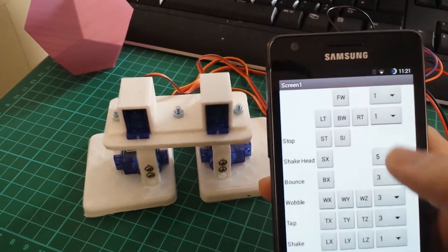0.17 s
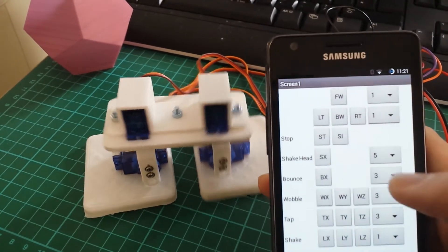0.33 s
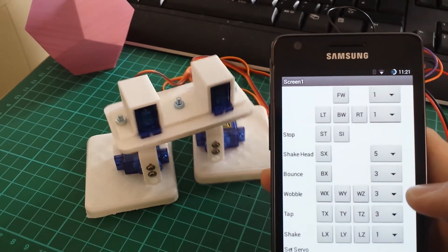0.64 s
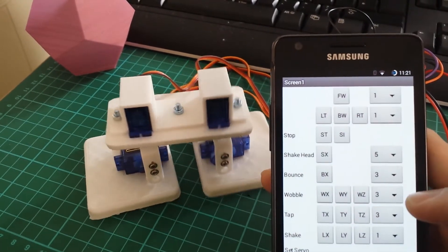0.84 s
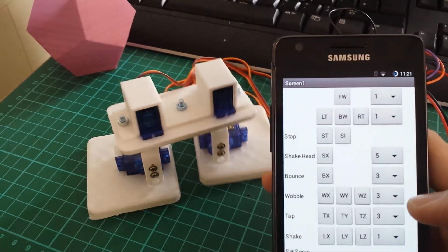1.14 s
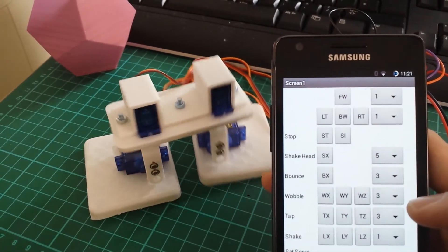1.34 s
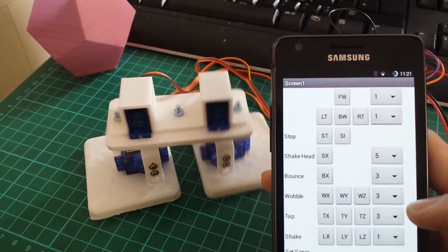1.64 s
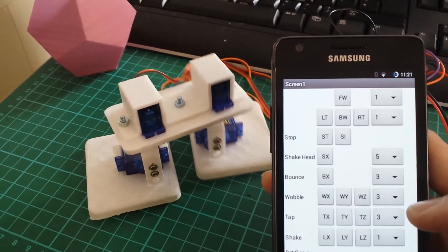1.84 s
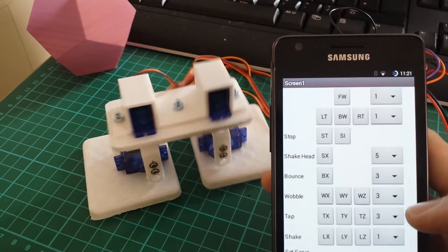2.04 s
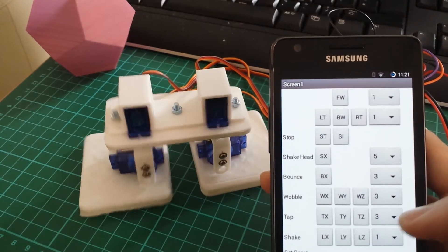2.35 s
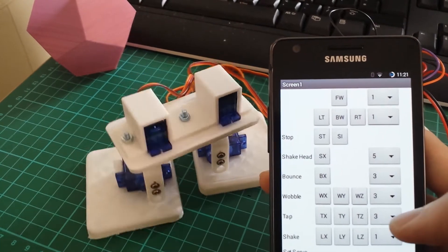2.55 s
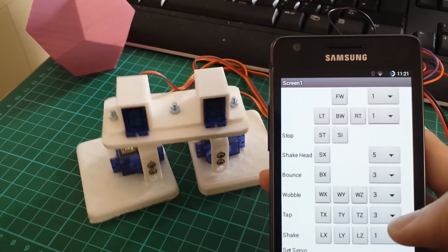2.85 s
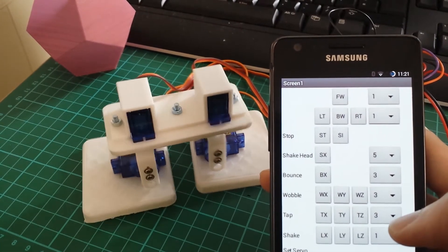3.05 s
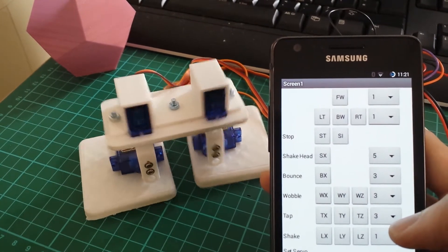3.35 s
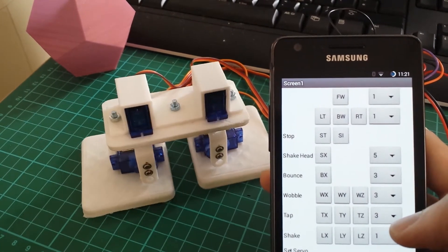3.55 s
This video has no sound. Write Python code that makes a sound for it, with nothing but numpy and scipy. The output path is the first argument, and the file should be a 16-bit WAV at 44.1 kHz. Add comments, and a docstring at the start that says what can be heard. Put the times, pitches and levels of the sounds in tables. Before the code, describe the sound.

Hobby servos in a little plastic robot buzz in a rapid run of bright bursts, their gears ticking between moves. Midway through, one foot knocks on the work table. The sound is close, with a low room hum underneath.

```python
"""Servo robot rocking on a table

Hobby servos rock a small plastic robot: loud fast swings alternate with slower, rougher strokes.
Gear teeth rattle in the servo cases, faster as the motors speed up; 50 Hz drive pulses jolt the gears.
Just past half-way a foot clacks down on the work table and rebounds. A low room hum lies underneath."""
import sys
import numpy as np
from scipy import signal
from scipy.fft import rfft, irfft, next_fast_len
from scipy.io import wavfile
from scipy.ndimage import uniform_filter1d, map_coordinates

SR = 44100
rng = np.random.default_rng(int(sys.argv[2]) if len(sys.argv) > 2 else 0)


def dump_mix(stems):
    """Bounce the given channels to the path in sys.argv[1] as a 16-bit WAV at rate SR."""
    frames = np.atleast_2d(stems).T  # one column per channel
    limited = np.clip(frames, -1, 1)  # hard clip at full scale
    pcm = np.round(limited * 32767).astype(np.int16)
    wavfile.write(sys.argv[1], SR, pcm)


N = 163170
T = np.arange(N) / SR
DRIVE_HZ, FIRST_PULSE_S = 50, .1555

# The rattle's bands, low to high. Each row: lower edge in Hz, then the share it takes of the
# rasp, treble and low-body boosts.
RATTLE_BANDS = [(0, 0, 0, 1), (1250, 0, 0, .4), (2800, 0, 0, 0), (5800, 1, 0, 0), (7200, 0, 0, 0),
                (9000, 0, 1, 0), (11500, 0, 1, 0)]


def from_db(db):
    """Decibels to gain."""
    return 10 ** (np.asarray(db) / 20)


def unit_rms(x):
    """Scale to rms 1."""
    return x / np.sqrt(np.mean(x ** 2) + 1e-20)


def pan(db):
    """Left and right gains of mean power 1; positive dB leans left."""
    return unit_rms(from_db([[db / 2], [-db / 2]]))


def stereo_noise(likeness=.55):
    """White noise, partly alike on left and right."""
    centre = np.sqrt(likeness) * rng.standard_normal(N)
    return centre + np.sqrt(1 - likeness) * rng.standard_normal((2, N))


def colour(x, points):
    """Minimum-phase EQ of unit power gain, shaped by (Hz, dB) or (Hz, left dB, right dB) points."""
    size = next_fast_len(N + SR // 2) * 2
    hz, *sides = np.transpose(points)
    log_hz = np.log(np.arange(size // 2 + 1) * SR / size + 1)
    curve = from_db([np.interp(log_hz, np.log(hz), db) for db in sides])
    top_loss = np.sqrt(1 + np.exp(20 * (log_hz - np.log(SR / 2.8))))
    cepstrum = irfft(np.log(unit_rms(curve / top_loss)))
    cepstrum[:, 1:size // 2] *= 2
    cepstrum[:, size // 2 + 1:] = 0
    return irfft(rfft(x, size) * np.exp(rfft(cepstrum)))[:, :N]


def resonance(x, hz, width_hz):
    """One ringing mode; white noise keeps its power."""
    r = np.exp(-np.pi * width_hz / SR)
    feedforward = np.sqrt((1 - r * r) / 2) * np.array([1, 0, -1])
    feedback = [1, -2 * r * np.cos(2 * np.pi * hz / SR), r * r]
    return signal.lfilter(feedforward, feedback, x + 1e-18)


def struck(clicks, hz, width_hz):
    """A unit click rings a mode at a height of about 1."""
    return resonance(clicks, hz, width_hz) / np.sqrt(4 * np.pi * width_hz / SR)


def dying(power, decay_s):
    """Power of bursts whose amplitude dies with the given time constant."""
    return signal.lfilter([1], [1, -np.exp(-2 / (decay_s * SR))], power + 1e-18)


def crack_envelope(power, crack_s, tail_s, tail_db):
    """Each impact is a short crack with a longer tail."""
    return np.sqrt(dying(power, crack_s) + from_db(tail_db) ** 2 * dying(power, tail_s))


def impacts(rows):
    """Power impulses from (seconds, dB) rows."""
    power = np.zeros(N)
    for s, db in rows:
        power[int(s * SR)] += from_db(db) ** 2
    return power


def hum():
    """Steady room hum and rumble, faded in at the start."""
    # Each row: pitch in Hz, level in dB before the fader.
    hum_tones = [(90.5, -72), (150, -66), (181, -73.5), (250, -70), (400, -70), (500, -82)]
    # The rumble's EQ. Each row: frequency in Hz, relative gain in dB.
    rumble_eq = [(20, 5), (45, -5), (90, 5), (170, 8), (260, 4), (370, 0), (470, -8), (800, -10),
                 (2000, -10), (6000, -15), (15000, -16)]
    # The fade-in and later level ride of both. Each row: time in seconds, gain in dB.
    fader = [(0, -11), (.13, -9.5), (.37, 1.5), (2.1, 3), (2.3, 6.5), (2.5, 1.5), (3.7, 3.5)]
    tones = sum(from_db(db) * np.sqrt(2) * np.sin(2 * np.pi * (hz * T + rng.random()))
                for hz, db in hum_tones)
    rumble = from_db(-58.5) * colour(stereo_noise(likeness=.33), rumble_eq)
    return pan(2.6) * from_db(np.interp(T, *np.transpose(fader))) * (tones + rumble)


def soft_tap():
    """One faint, damped tap just before the servos start."""
    return from_db(-48.5) * struck(impacts([(.148, 0)]), hz=900, width_hz=140)


def pulse_envelope(decay_s):
    """Jumps to 1 at each drive pulse and dies away."""
    since_pulse_s = (T - FIRST_PULSE_S) % (1 / DRIVE_HZ)
    return np.exp(-since_pulse_s / decay_s)


def load_wobble(depth_db=1.06, step_s=.018):
    """A random gain: the load on the gears wavers."""
    knots = rng.standard_normal(1000)
    return from_db(depth_db * np.interp(T / step_s, np.arange(len(knots)), knots))


def teeth(per_s, uneven_db, jitter=.27, surge_db=6.5):
    """Gear teeth collide at uneven times and strengths: one envelope of rms 1 for each band."""
    chance = rng.standard_normal((6000, 2 + len(RATTLE_BANDS)))
    hit_at = np.searchsorted(np.cumsum(per_s) / SR, np.arange(len(chance)) + jitter * chance[:, 0])
    # each drive pulse briefly pushes the gears harder
    surge = from_db(surge_db * pulse_envelope(decay_s=.003)) ** 2 / per_s
    sizes, envelopes = np.clip(chance, -2, 2), []
    for tint_db in sizes[:, 2:].T:   # each impact favours different bands
        hits = np.bincount(hit_at, from_db(uneven_db * sizes[:, 1] + tint_db) ** 2, N + 1)[:N]
        power = hits * surge * load_wobble() ** 2
        envelopes.append(unit_rms(crack_envelope(power, crack_s=.00081, tail_s=.0079, tail_db=1)))
    return envelopes


def flicker(x, width_hz=110, life_s=.045):
    """Random narrow peaks and dips flicker through the rattle's noise, strongest in the low mids."""
    # Each row: frequency in Hz, typical depth in dB.
    depths = [(600, 10), (1400, 9), (2300, 4), (4000, 3), (8000, 3), (14000, 3.5)]
    hz, t, spectrum = signal.stft(x, SR, nperseg=2048, noverlap=1792)
    knots = rng.standard_normal((700, 300))
    grid = np.meshgrid(hz / width_hz, t / life_s, indexing="ij")
    field = unit_rms(map_coordinates(knots, grid, order=1, mode="wrap"))
    gain = from_db(np.interp(hz, *np.transpose(depths))[:, None] * np.clip(field, -2, 1.5))
    gain /= np.sqrt(uniform_filter1d(np.mean(gain ** 2, axis=1), size=9))[:, None]   # keep the power
    return signal.istft(spectrum * gain, SR, nperseg=2048, noverlap=1792)[1][:, :N]


def band_noises():
    """The rattle's raw texture: flickering stereo noise, split into bands."""
    spectrum = rfft(flicker(stereo_noise()))
    hz = np.arange(N // 2 + 1) * SR / N
    edges = [band[0] for band in RATTLE_BANDS] + [SR]
    return [irfft(spectrum * ((hz >= low) & (hz < high)), N) for low, high in zip(edges, edges[1:])]


def jolts(case_eq):
    """Drive pulses tick the resting gears; the hardest ones snap across the backlash."""
    # Gear chatter while holding position. Each row: time in seconds, level in dB.
    holding = [(.15, -62), (.19, -45), (.4, -42), (1.5, -41.5), (2.3, -46), (3.4, -41), (3.53, -50.5),
               (3.62, -43.5), (3.665, -52), (3.7, -75)]
    # The gears take up their slack. Each row: time in seconds, relative level in dB, treble boost in dB.
    slack_snaps = [(0.1582, -41, 11), (0.173, -42, -14), (0.2008, -38, 8), (0.222, -34.5, 17),
                   (0.338, -37, -8), (0.656, -31, -6), (0.6991, -26, -10), (0.818, -40, -5),
                   (0.838, -29, 7), (0.8601, -28.5, -4), (0.9964, -40, 2), (1.0166, -26, 3),
                   (1.0576, -25, 3), (1.0842, -22, 1), (1.1947, -30, -12), (1.3353, -27, -15),
                   (1.361, -24.5, -5), (1.383, -25, 0), (1.4204, -26.5, 16), (1.516, -38, -7),
                   (1.538, -30, -7), (1.5588, -36, 14), (1.5807, -29, 2), (1.6744, -29, -1),
                   (1.7915, -24, -4), (1.976, -30, 5), (1.9977, -30, -11), (2.018, -26, -4),
                   (2.249, -22.5, 5), (2.2518, -21, 11.5), (2.255, -21, 9), (2.359, -27, -4),
                   (2.3815, -20, 0), (2.6364, -22.5, -1), (2.8181, -30, -11.5), (2.8358, -27, -7),
                   (2.895, -26, 0), (2.9966, -28, -2), (3.1635, -33, 10), (3.1725, -34, -5),
                   (3.4943, -28.5, -12), (3.554, -39, -6), (3.5754, -41, -10), (3.6568, -41, 18.5)]
    ticking = unit_rms(pulse_envelope(decay_s=.0058) + from_db(-8))   # a floor between pulses
    chatter = from_db(np.interp(T, *np.transpose(holding))) * (T > FIRST_PULSE_S) * ticking
    rattles = teeth(per_s=np.full(N, 600), uneven_db=4.5)
    out = 0
    for rattle, noise, (_, _, treble, _) in zip(rattles, band_noises(), RATTLE_BANDS):
        snaps = impacts([(s, db - 1 + treble * treble_db) for s, db, treble_db in slack_snaps])
        out = out + noise * np.sqrt((chatter * rattle) ** 2 + dying(snaps, decay_s=.0019))
    return colour(out, case_eq)


def gears(strokes, case_eq, base_teeth_per_s, uneven_db, modes_db):
    """Each stroke speeds up, holds and slows; the teeth's rate and force follow, and the case rings."""
    # Weaker modes of the servo cases. Each row: pitch in Hz, width in Hz, relative level in dB.
    case_modes = [(2260, 22, -28), (3310, 210, -29), (5140, 54, -22.5), (7570, 65, -10.5), (9370, 90, -31),
                  (13040, 83, -27)]
    rows = np.array(strokes)
    speeds = np.array([np.interp(T, row[0] + np.cumsum([0, *row[1:4]]), [0, 1, 1, 0]) for row in rows])
    db, ring_db, rasp_db, treble_db, low_db = rows[:, 4:].T

    def force(levels_db):
        """One envelope for all strokes, each at its own level."""
        return np.sqrt(from_db(levels_db) ** 2 @ speeds ** 2)

    rattles = teeth(base_teeth_per_s * (.3 + .76 * speeds.max(axis=0)), uneven_db)
    body = sum(rattle * noise * force(db + rasp * rasp_db + treble * treble_db + low * low_db)
               for rattle, noise, (_, rasp, treble, low) in zip(rattles, band_noises(), RATTLE_BANDS))
    low_cut = signal.butter(3, 1020, "high", fs=SR, output="sos")   # small cases radiate little bass
    body = signal.sosfilt(low_cut, colour(body, case_eq))
    grit = rattles[2] * stereo_noise()
    ring_level = np.sqrt(from_db(db + ring_db) ** 2 @ speeds)   # already sings at low speed
    ring = resonance(grit * ring_level, hz=3972, width_hz=120)
    push = grit * force(db + modes_db)
    modes = sum(from_db(level) * resonance(push, hz, width) for hz, width, level in case_modes)
    # a dry zing stands out in the raspy strokes
    zing = resonance(grit * force(db - 21.5 + 4.9 * rasp_db), hz=6780, width_hz=180)
    return body + from_db(-4.5) * pan(-19) * ring + pan(-29) * (modes + zing)


def slow_strokes(case_eq):
    """Slow moves and short nudges: the teeth strike sparsely, for a rough rasp."""
    # Each row: start, speed-up, hold and slow-down in seconds, relative level in dB,
    # then case ring, rasp, treble and low-body boosts in dB.
    strokes = [(0.205, 0.053, 0.018, 0.065, -32, -18, 3.5, 5, -4),
               (0.512, 0.012, 0.13, 0.015, -33, -4, -0.5, 2.5, -5),
               (0.82, 0.065, 0.053, 0.068, -33.2, -18, 3, 2, 0),
               (1.153, 0.065, 0.075, 0.016, -31, -3, -1, 2, -2),
               (1.566, 0.035, 0.035, 0.022, -31, -18, 3.1, 5.5, 2),
               (1.78, 0.093, 0.049, 0.096, -33.5, 1, 1.5, 3.5, 11.5),
               (2.13, 0.037, 0.003, 0.11, -34, -11, 2.5, 7, 13.5),
               (2.203, 0.0075, 0.0025, 0.0078, -28.5, -24, 3.4, 14, -2),
               (2.238, 0.012, 0.006, 0.015, -23.5, -24, 3, 5, -16),
               (2.262, 0.019, 0.039, 0.042, -30, -19, 2.5, 7.5, 8),
               (2.352, 0.008, 0.062, 0.12, -27.5, -17, 2, 5, 0),
               (2.82, 0.066, 0.044, 0.061, -33, -7, 4, 2.5, 7.5),
               (3.14, 0.051, 0.088, 0.041, -31, -9, 2, 2.5, -2)]
    return from_db(-2.55) * gears(strokes, case_eq, base_teeth_per_s=300, uneven_db=1.5, modes_db=-.5)


def foot_knocks(ring_width_hz=230):
    """Plastic feet hit the table: a crack, the frame's modes, two broad rings set by where they land."""
    # Landings and rebounds. Each row: time in seconds, level in dB, lower and upper ring in Hz.
    landings = [(.213, -47, 920, 1610), (2.266, -36, 895, 1600), (2.281, -27.5, 617, 1630),
                (2.2846, -35, 362, 1450), (2.297, -41, 630, 1430), (2.335, -30.5, 885, 2460)]
    # The crack's EQ. Each row: frequency in Hz, relative gain in dB.
    crack_eq = [(60, 9), (250, 9), (600, 1), (950, 6.5), (1500, 3.5), (2000, 4), (2700, 9), (4500, 8),
                (12000, -14)]
    # The plastic frame's ring. Each row: pitch in Hz, width in Hz, relative level in dB.
    frame_modes = [(344, 63, -16), (619, 18, -22.5), (794, 17, -21.5), (1380, 25, -21), (1510, 23, -16),
                   (1674, 20, -23), (1910, 37, -20), (2180, 22, -31), (2650, 19, -22), (2800, 35, -16)]
    hits = impacts([row[:2] for row in landings])
    clatter = stereo_noise()
    crack = colour(clatter * crack_envelope(hits, crack_s=.00083, tail_s=.028, tail_db=-14), crack_eq)
    frame = sum(from_db(db) * struck(np.sqrt(hits), hz, width) for hz, width, db in frame_modes)
    rings = 0
    for s, db, low_hz, high_hz in landings:
        push = clatter * np.sqrt(dying(impacts([(s, db - 13)]), decay_s=.0083))
        rings += from_db(-3.5) * resonance(push, low_hz, ring_width_hz / 2)
        rings += resonance(push, high_hz, ring_width_hz)
    return pan(1.1) * (crack + from_db(-.5) * frame + rings)


def fast_swings():
    """Loud, quick moves: the tooth impacts crowd into a bright whirr."""
    # Each row: start, speed-up, hold and slow-down in seconds, relative level in dB,
    # then case ring, rasp, treble and low-body boosts in dB.
    swings = [(0.346, 0.075, 0.017, 0.074, -25.5, -11.5, 0.5, 1, 0.5),
              (0.663, 0.08, 0.018, 0.059, -24.5, -19, 0.5, -2, -2),
              (1.006, 0.087, 0.014, 0.059, -24.5, -7, 1, 0, -4),
              (1.326, 0.069, 0.05, 0.045, -25.5, -8, 1.5, -2, -2.5),
              (1.666, 0.076, 0.0046, 0.085, -24, -6.5, 0.5, -2, 1.5),
              (1.984, 0.082, 0.008, 0.088, -23.5, -12.5, 2, -2, -1),
              (2.449, 0.0063, 0.054, 0.14, -27.5, -6, -1, -2.5, 0.5),
              (2.644, 0.054, 0.067, 0.036, -25, -11, 0, -1, -6.5),
              (2.981, 0.06, 0.065, 0.038, -25, -10.5, 0.5, -1, -8.5),
              (3.304, 0.063, 0.049, 0.051, -25, -9.5, 1, -1, -8)]
    # The cases' tone at high speed. Each row: frequency in Hz, relative left and right gain in dB.
    case_eq = [(300, -47, -28), (700, -16.5, -44), (1300, -22, -29), (1930, -18.5, -15), (2870, -17, -13.5),
               (3260, -13.5, -6.5), (4900, -15, -9.5), (5200, -11, -6), (5760, -11, -9.5), (6650, -5, -9.5),
               (7360, -12.5, 0.5), (8280, -14, -5), (9930, -12.5, -5.5), (10140, -23.5, -10),
               (12700, -16.5, -13.5), (13100, -20, -4.5), (14400, -28, -14)]
    return from_db(-1.35) * gears(swings, case_eq, base_teeth_per_s=800, uneven_db=2.5, modes_db=-2)


def room(x, t60_s=.2, level_db=-15):
    """A short diffuse tail, different on each side."""
    t = T[:SR // 2]
    tail = rng.standard_normal((2, len(t))) * from_db(-60 * t / t60_s) * (t > .004)
    return from_db(level_db) * signal.fftconvolve(x, unit_rms(tail) / np.sqrt(len(t)), axes=1)[:, :N]


def scene():
    """The robot stands a little to the right in a humming room, so it reaches the left side late."""
    # The cases' tone at low speed. Each row: frequency in Hz, relative left and right gain in dB.
    slow_case_eq = [(300, -23, -32.5), (710, -22.5, -35.5), (1330, -22, -25.5), (2000, -18.5, -13),
                    (2800, -14.5, -12), (3160, -10.5, -2.5), (4900, -13, -6.5), (5570, -13.5, -6),
                    (5680, -7, -7.5), (6700, -5.5, -8.5), (7640, -16.5, 0), (8200, -13, -7),
                    (9500, -17.5, -8.5), (10100, -23.5, -13), (12300, -23.5, -17.5), (13300, -32, -14),
                    (14500, -35, -17.5)]
    robot = fast_swings() + slow_strokes(slow_case_eq) + jolts(slow_case_eq) + foot_knocks() + soft_tap()
    left_lag_s = .00011
    robot[0] = np.roll(robot[0], round(left_lag_s * SR))
    return robot + room(robot) + hum()


def record(dry):
    """A steep low-pass takes off the very top."""
    return signal.sosfilt(signal.ellip(12, .2, 80, 14550, fs=SR, output="sos"), dry)


dry = scene()
out = record(dry)
dump_mix(out)
```